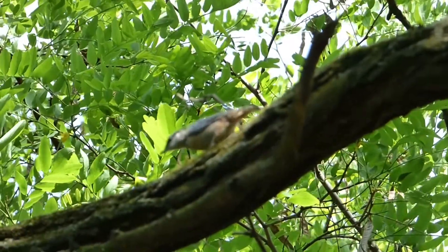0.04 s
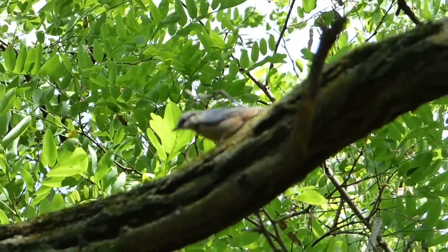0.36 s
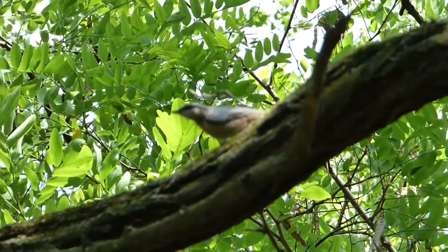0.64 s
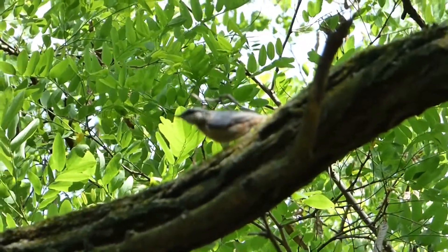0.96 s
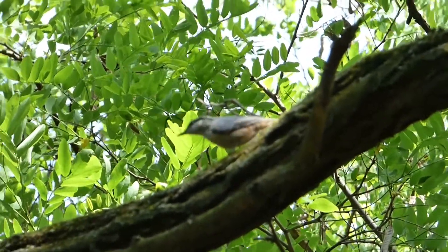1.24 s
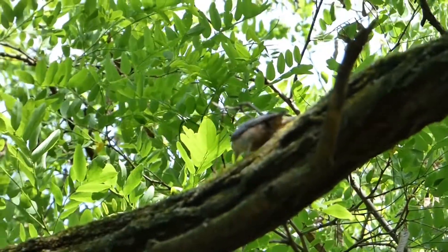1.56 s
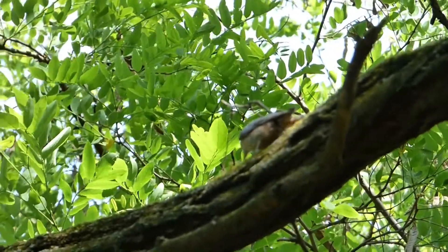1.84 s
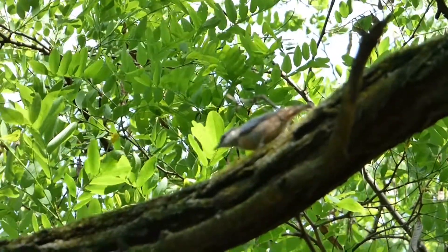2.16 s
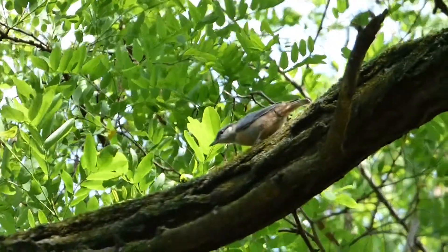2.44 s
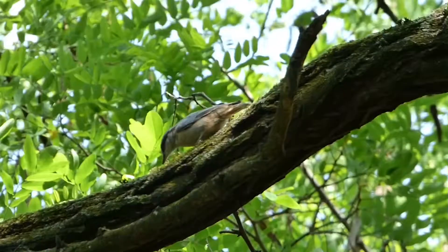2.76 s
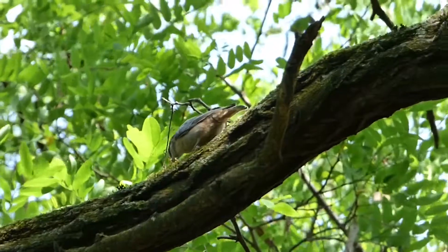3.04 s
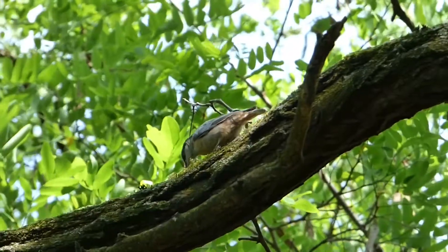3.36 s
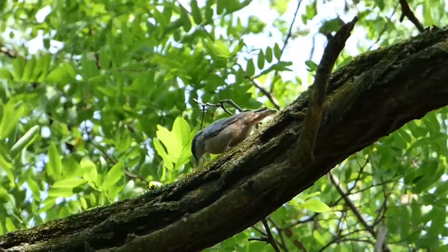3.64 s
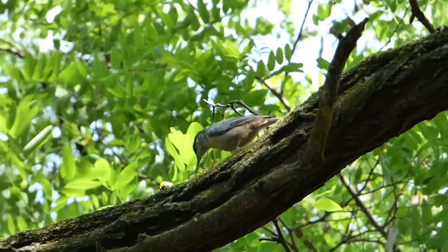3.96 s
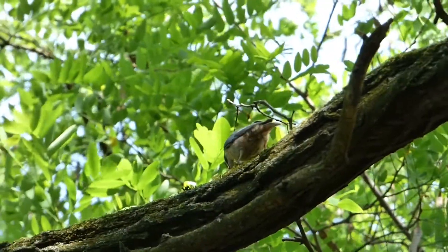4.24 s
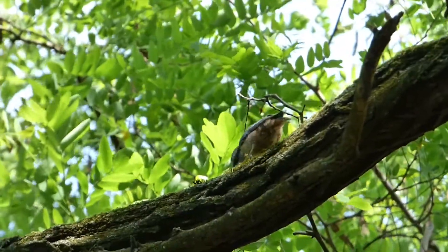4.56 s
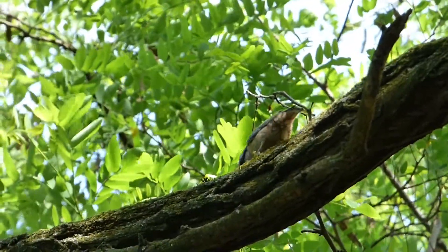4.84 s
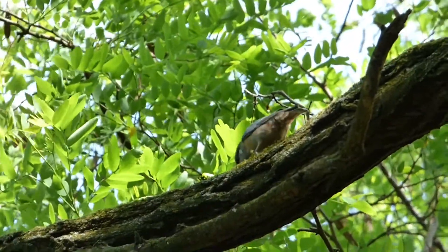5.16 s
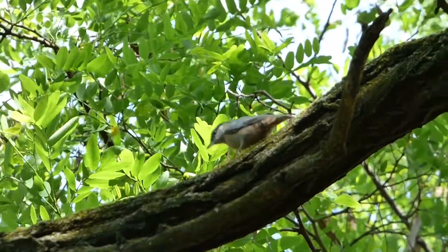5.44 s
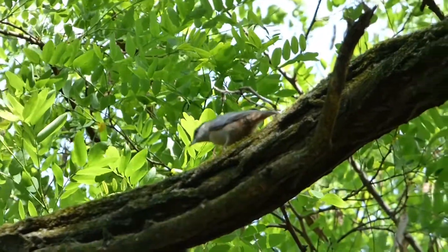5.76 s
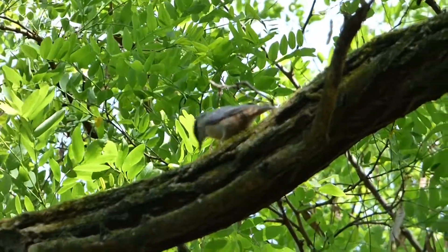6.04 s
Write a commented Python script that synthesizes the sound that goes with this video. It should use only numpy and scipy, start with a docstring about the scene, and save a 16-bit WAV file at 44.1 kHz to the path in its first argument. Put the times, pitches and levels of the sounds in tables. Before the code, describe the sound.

A startled bird close to the microphone clucks, lets out a rasping screech and flies past from right to left with six piercing, rough notes. It clucks again more quietly as it settles. After that the wood is calm, with a light tap on bark and thin, high whistles from distant birds. Faint leaf rustle and far traffic continue throughout, and each call has a short, soft echo.

```python
"""In a leafy wood a startled bird clucks, screeches and flies past from right to left with six shrill
alarm notes, then clucks again as it settles. Its voice comes from thin skins vibrating in its throat.
Small birds whistle far off, something taps on bark, and distant traffic murmurs under the rustle
of the leaves. Trunks and foliage scatter every call into soft echoes."""
import sys
import numpy as np
from scipy import signal
from scipy.fft import rfft, irfft
from scipy.io import wavfile

SR = 44100
rng = np.random.default_rng(int(sys.argv[2]) if len(sys.argv) > 2 else 0)


def master_out(mix):
    """Clip the mix to full scale and print it as 16-bit PCM to the path in sys.argv[1]."""
    frames = np.transpose(np.atleast_2d(mix))
    ceiling = np.clip(frames, -1, 1)
    pcm = np.round(ceiling * 32767).astype(np.int16)
    wavfile.write(sys.argv[1], SR, pcm)


N = 273420
TIME = np.arange(N) / SR


def from_db(db):
    """Turn decibels (dB) into a number to multiply a sound by."""
    return 10 ** (np.asarray(db) / 20)


def unit_power(x):
    """Scale a sound so that its average power is 1."""
    return x / np.sqrt(np.mean(x ** 2) + 1e-20)


def wobble(rate_hz, size):
    """A random wavering, about 1 in size and mostly slower than the given rate."""
    smooth = signal.butter(2, rate_hz, fs=SR, output="sos")
    return unit_power(signal.sosfilt(smooth, rng.standard_normal(size + SR // 10))[-size:])


def flutter(rate_hz, depth, size):
    """Loudness that stumbles at random between weak and strong."""
    return np.maximum(1 + depth * np.tanh(wobble(rate_hz, size)), 0)


def phase_of(hz):
    """The running angle of a tone whose pitch changes; its sine is the tone."""
    return 2 * np.pi * np.cumsum(hz) / SR


def progress(length_s):
    """Count from 0 to 1 over a note, one value a sample."""
    return np.linspace(0, 1, int(length_s * SR))


def envelope(t, length, attack_s, release_s):
    """Loudness that rises, holds until the length is over, then dies away."""
    return np.clip(t / attack_s, 0, 1) * np.exp(-np.maximum(t - length, 0) / release_s)


def coloured(x, curve, peaks=()):
    """Make some frequencies louder and others softer along a curve, with any narrow peaks or dips."""
    points_hz, points_db = np.transpose(curve)
    hz = np.maximum(np.arange(N // 2 + 1) * SR / N, 1)
    curve_db = np.interp(np.log(hz), np.log(points_hz), points_db)
    peaks_db = sum(db * np.exp(-((hz - centre) / width) ** 2) for centre, width, db in peaks)
    return irfft(rfft(x) * from_db(curve_db + peaks_db), N)


def add(out, start_s, sound, pan_db):
    """Mix a sound in at a time; pan is how many dB louder it is on the left than on the right."""
    i = int(start_s * SR)
    out[:, i:i + len(sound)] += from_db([[pan_db / 2], [-pan_db / 2]]) * sound[:N - i]


def noise_pair(size, alike):
    """Hiss for left and right, from unrelated (alike = 0) to the same (alike = 1)."""
    mid, side = rng.standard_normal((2, size))
    return np.sqrt(1 + alike) * mid + np.sqrt(1 - alike) * side * [[1], [-1]]


def scatter(x, fade_s, build_s, alike, dull_hz):
    """A cloud of echoes that builds up, then falls by 60 dB over fade_s."""
    t = TIME[:SR]
    low, high = (signal.butter(3, 8500, kind, fs=SR, output="sos") for kind in ("low", "high"))
    echoes = signal.sosfilt(low, noise_pair(SR, alike))
    echoes += signal.sosfilt(high, noise_pair(SR, 0))  # the highest part sounds widest
    echoes *= from_db(-60 * t / fade_s) * (1 - np.exp(-(t / build_s) ** 2))
    echoes /= np.sqrt(np.sum(echoes ** 2, axis=1, keepdims=True))
    dull = signal.butter(1, dull_hz, fs=SR, output="sos")
    return signal.sosfilt(dull, signal.fftconvolve(x, echoes, axes=1)[:, :N])


def wood(x, near_db, far_db):
    """Near branches echo from the caller's side, the deep wood from all round."""
    # The highest sounds are briefly smeared and spread wide between left and right.
    smear_above_hz = 9500
    low, high = (signal.butter(3, smear_above_hz, kind, fs=SR, output="sos") for kind in ("low", "high"))
    smeared = scatter(signal.sosfilt(high, x), fade_s=.04, build_s=.001, alike=0, dull_hz=19000)
    near = scatter(x, fade_s=.16, build_s=.008, alike=.4, dull_hz=17000)
    far = scatter(x.mean(axis=0, keepdims=True), fade_s=.61, build_s=.022, alike=.71, dull_hz=10500)
    return signal.sosfilt(low, x) + smeared + from_db(near_db) * near + from_db(far_db) * far


def traffic_and_leaves():
    """Far traffic murmurs low down and leaves rustle high up, in one wide, nearly steady noise."""
    # The noise both ears share. Each row: frequency in Hz, relative level in dB.
    mid_curve = [(25, -24), (60, -12), (90, -5), (180, -4.5), (280, -0.5), (450, -4), (800, -6.5),
                 (1200, -10), (1800, -19), (3300, -24.5), (4800, -20.5), (7000, -25.5), (10000, -31),
                 (15000, -44)]
    # The noise that differs between the ears. Each row: frequency in Hz, relative level in dB.
    side_curve = [(25, -23), (200, -27.5), (320, -19), (440, -4.5), (620, -11.5), (880, -8.5), (1200, -15),
                  (1500, -10), (1750, -22), (3300, -30), (4800, -27.5), (7000, -30), (10000, -35.5),
                  (15000, -43.5)]
    # Narrow peaks and dips in both. Each row: centre in Hz, width in Hz, boost or cut in dB.
    peaks = [(224.8, 12.5, 5), (386.5, 24, -10.5), (800, 61, 4), (4003, 40, 6)]
    mid = coloured(rng.standard_normal(N), mid_curve, peaks)
    side = coloured(rng.standard_normal(N), side_curve, peaks)
    level = from_db(-49 + .65 * wobble(4.3, N))
    return level * (mid + side * [[1], [-1]]) / np.std(mid)


def whistles():
    """Small birds sing thin, sliding notes; the two sides of a voice box can each sing their own."""
    # The whistles. Each row: start in seconds, length in seconds, first pitch in Hz,
    # last pitch in Hz, level in dB, number of voices.
    notes = [(0.04, 0.027, 4770, 5080, -52.5, 1), (0.106, 0.057, 3590, 4170, -54, 1),
             (.131, 0.13, 7700, 6730, -62.5, 2), (1.924, 0.062, 7620, 6870, -58.5, 2),
             (2.55, .065, 8170, 6700, -58.5, 2), (3.378, 0.076, 7400, 6900, -62, 1),
             (3.397, 0.19, 8340, 10400, -61.5, 1), (3.856, .11, 7630, 6640, -57, 2),
             (4.09, .085, 7270, 6580, -61, 2), (4.381, 0.13, 7340, 6810, -59.5, 2),
             (4.364, .16, 4080, 3970, -59.5, 1), (4.383, 0.1, 12340, 12230, -62, 1),
             (5.084, 0.047, 10000, 9000, -59.5, 1), (5.394, 0.099, 7390, 8280, -51, 1),
             (5.629, 0.12, 7750, 8480, -56, 1)]
    upper_ratio, upper_db, quaver = 1.14, 1, .147  # quaver is a share of the slide
    out = np.zeros((2, N))
    for start, length, from_hz, to_hz, db, voices in notes:
        along = progress(length)
        slide = along + quaver * wobble(200, len(along))
        phase = phase_of(from_hz + (to_hz - from_hz) * slide)
        tone = np.sin(phase)
        if voices > 1:
            tone += from_db(upper_db) * np.sin(upper_ratio * phase)
        arch = np.sqrt(abs(np.sin(np.pi * along)))
        add(out, start, from_db(db) * arch * tone, pan_db=1)
    return out


def clucks():
    """Each cluck is one quick rise and fall in pitch, doubled by an echo off a trunk."""
    # The clucks. Each row: start in seconds, length in seconds, top pitch in Hz, level in dB, pan in dB.
    notes = [(0.106, 0.014, 2420, -48, -5), (0.273, 0.025, 2670, -41, -6.5),
             (0.393, 0.013, 2986, -34, -9.5), (1.733, 0.014, 2730, -39, 6), (1.872, 0.014, 2655, -41.5, 4),
             (2.268, 0.018, 2520, -49.5, 4)]
    top_s, bend_s, rest_share = .00495, .00509, .62  # the pitch settles at this share of its top
    fade_db_per_s, echo_s, echo_db = 145, .013, -5
    out, t = np.zeros((2, N)), TIME[:SR // 10]
    bend = rest_share + (1 - rest_share) * np.exp(-((t - top_s) / bend_s) ** 2)
    for start, length, hz, db, pan_db in notes:
        level = from_db(db - fade_db_per_s * t) * envelope(t, length, attack_s=.0044, release_s=.0047)
        phase = phase_of(hz * bend * (1 + .044 * wobble(690, len(t))))
        note = level * (np.sin(phase) + from_db(-28) * np.sin(2 * phase))
        add(out, start, note, pan_db)
        add(out, start + echo_s, from_db(echo_db) * note, pan_db)
    return out


def scrape():
    """A short, dry, fluttering hiss opens the screech."""
    # The tone colour of the scrape. Each row: frequency in Hz, relative level in dB.
    curve = [(1200, -18), (2000, 1.5), (3500, 1), (4800, -3), (6200, -1), (7500, -12.5), (12500, -17.5),
             (15000, -34)]
    start_s = .4875
    level = from_db(-42) * envelope(TIME - start_s, length=.05, attack_s=.017, release_s=.023)
    return level * flutter(400, .37, N) * unit_power(coloured(rng.standard_normal(N), curve))


def screech_pushes():
    """The screech comes in two short pushes and a long one; each climbs in pitch and grows rougher."""
    # The pushes. Each row: start in seconds, length in seconds, rise time in seconds,
    # first pitch in Hz, level in dB, first roughness from 0 to 1.
    pushes = [(0.575, 0.0338, 0.019, 2101, -32.5, 0.56), (0.643, 0.031, 0.0049, 2200, -26, 0.42),
              (.706, 0.14, .005, 2301, -26.5, 0.26)]
    climb_hz_per_s, roughen_per_s, accent_db, accent_s = 620, 2.2, 3, .027
    rows = np.array(pushes)
    latest = np.maximum(np.searchsorted(rows[:, 0], TIME) - 1, 0)  # which push rules each moment
    start, length, attack_s, hz, db, rough = rows[latest].T
    t = np.maximum(TIME - start, 0)
    held_s = np.minimum(t, length)
    level = from_db(db + accent_db * np.exp(-t / accent_s))
    level *= envelope(t, length, attack_s, release_s=.52 * length)
    return hz + climb_hz_per_s * held_s, level, np.clip(rough + roughen_per_s * held_s, 0, 1)


def voice_crack():
    """The voice breaks in a quick downward squeak."""
    # The tones in a crack. Each row: multiple of the pitch, relative level in dB.
    harmonics = [(1, -7), (2, 7), (3, 0), (4, -9)]
    from_hz, to_hz = 3600, 2100
    along = progress(length_s=.025)
    phase = phase_of(to_hz + (from_hz - to_hz) * (1 - along) ** 3)
    arch = np.sqrt(abs(np.sin(np.pi * along)))
    return arch * sum(from_db(db) * np.sin(multiple * phase) for multiple, db in harmonics)


def screech():
    """Thin skins in the voice box beat wildly; the throat favours the tone at twice their pitch."""
    # The tones in the voice. Each row: multiple of the pitch, relative level in dB, added roughness.
    harmonics = [(1, -21.5, 1.25), (2, 1.5, 0.09), (3, -9.5, 0.61), (4, -11.5, 1), (5, -41, 1.0),
                 (6, -18.5, 0.62)]
    # The tone colour of the rasping hiss. Each row: frequency in Hz, relative level in dB.
    rasp_curve = [(1200, -53), (2200, 8), (3200, -1), (4500, -1), (7000, 11.5), (8500, -3.5), (11500, 2.5),
                  (15000, -14)]
    # Voice cracks early in the two loud pushes. Each row: start in seconds, level in dB.
    cracks = [(.648, -37), (.712, -33)]
    hz, level, rough = screech_pushes()
    phase = phase_of(hz * (1 + rough * (.045 * wobble(645, N) + .0325 * wobble(124, N))))
    voice = np.zeros(N)
    for multiple, db, blur in harmonics:
        strength = from_db(db) * flutter(310, rough, N)
        voice += strength * np.sin(multiple * phase + 2 * blur * rough * wobble(250, N))
    rasp = unit_power(coloured(rng.standard_normal(N), rasp_curve))
    call = level * (voice * flutter(330, 1.1 * rough, N) + from_db(-4) * rough * rasp) + scrape()
    take_off_s, crossed_s = .7, .86  # the bird flies from the right to just left of the middle
    pan_db = np.interp(TIME, [take_off_s, crossed_s], [-3.5, 1])
    out = call * from_db([pan_db / 2, -pan_db / 2])
    for start, db in cracks:
        add(out, start, from_db(db) * voice_crack(), pan_db[int(start * SR)])
    return out


def alarm_shape(length):
    """One alarm note flicks down, sags and plunges in pitch; it swells, and is roughest early on."""
    flick_s, sag_per_s, plunge_s = .0028, .433, .028
    roughest_s, rough_spread_s = .0147, .01277
    attack_s, swell_s, rise_db, release_s = .0012, .041, 10, .0057
    t = length * progress(length)
    ragged = np.exp(-((t - roughest_s) / rough_spread_s) ** 2)
    flick = np.exp(-t / flick_s)
    plunge = np.maximum(1 - (length - t) / plunge_s, 0) ** 2
    bend = 1 + .33 * flick + .0298 * ragged - sag_per_s * t - .42 * plunge
    swell_db = rise_db * np.minimum(t / swell_s - 1, 0)
    fades = np.clip(np.minimum(t / attack_s, (length - t) / release_s), 0, 1)
    return bend, swell_db, fades, .28 + .72 * ragged


def alarms():
    """The flying bird gives six shrill, rough notes, shaped by its throat and beak."""
    # The alarm notes. Each row: start in seconds, length in seconds, pitch in Hz, level in dB,
    # pan in dB, harshness (0 is smooth, about 1 is very rough).
    notes = [(0.92, 0.071, 5986, -21.5, 2.5, 0.5), (1.03, .07, 6280, -23.5, 2.5, 0.83),
             (1.144, 0.068, 6310, -24, 3, 0.86), (1.256, 0.067, 6310, -24.5, 2.5, 0.82),
             (1.368, .07, 6026, -24, 2.5, 0.96), (1.496, 0.065, 6100, -25, 3, 1.06)]
    # What throat and beak let through. Each row: frequency in Hz, boost or cut in dB.
    beak_curve = [(1500, -3.5), (3200, -4.5), (4300, -1.5), (6300, -1), (7800, -2), (9200, -0.5),
                  (10200, 3), (12000, -2), (12900, -3), (15000, -16)]
    out = np.zeros((2, N))
    for start, length, hz, db, pan_db, harshness in notes:
        bend, swell_db, fades, rough_share = alarm_shape(length)
        size, rough = len(bend), harshness * rough_share
        warble = np.sin(phase_of(190 * (1 + .275 * wobble(78.7, size))))
        drift = .0088 * wobble(58, size)
        shake = rough * (.072 * warble + .09 * wobble(1060, size))
        phase = phase_of(hz * bend * (1 + drift + shake))
        # a tone at twice the pitch grows with effort and fades in the plunge
        effort = from_db(.4 * swell_db) * np.clip((bend - .72) / .058, 0, 1)
        overtone = from_db(-18) * effort * np.sin(2 * phase + .63 * wobble(520, size))
        voice = np.sin(phase) + overtone + from_db(-22) * rng.standard_normal(size)
        level = from_db(db + swell_db) * fades * flutter(380, .94 * rough, size)
        add(out, start, level * voice, pan_db)
    return coloured(out, beak_curve)


def bark_taps():
    """One light hit, and later a tight cluster of three, make the bark ring very briefly."""
    # The hits. Each row: start in seconds, level in dB.
    hits = [(1.127, -39.5), (2.689, -38), (2.689, -36.5), (2.6912, -39.5)]
    # The tones bark rings with. Each row: pitch in Hz, relative level in dB, seconds to fade by 60 dB.
    tones = [(1320, -0.5, .016), (1970, -5, 0.0079), (2600, -4.5, 0.015), (3830, 4.5, 0.0077),
             (5030, 1.5, 0.0036), (6650, -2, 0.0059), (9800, -1.5, 0.006)]
    out, t = np.zeros((2, N)), TIME[:SR // 10]
    for start, db in hits:
        ring = sum(rng.choice([-1, 1]) * from_db(tone_db - 60 * t / fade_s) * np.sin(2 * np.pi * hz * t)
                   for hz, tone_db, fade_s in tones)
        add(out, start, from_db(db) * ring, pan_db=-7)
    return out


def scene():
    """The startled bird and the taps are close by, the small birds deep in the wood."""
    bird = wood(screech(), near_db=-3.5, far_db=-7.5)
    bird += wood(alarms(), near_db=.5, far_db=-3)
    bird += wood(clucks(), near_db=-2, far_db=-4.5)
    far_birds = wood(whistles(), near_db=.5, far_db=-.5)
    taps = wood(bark_taps(), near_db=-19, far_db=-24)
    background = traffic_and_leaves() * from_db([[-.5], [.5]])  # a little louder on the right
    return bird + far_birds + taps + background


def record(dry):
    """Cut away the very highest sounds steeply."""
    cutoff_hz = 15000
    return signal.sosfilt(signal.ellip(10, .2, 80, cutoff_hz, fs=SR, output="sos"), dry)


dry = scene()
out = record(dry)
master_out(out)
```